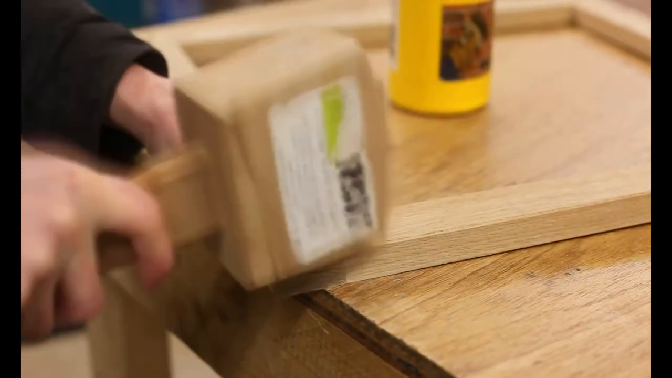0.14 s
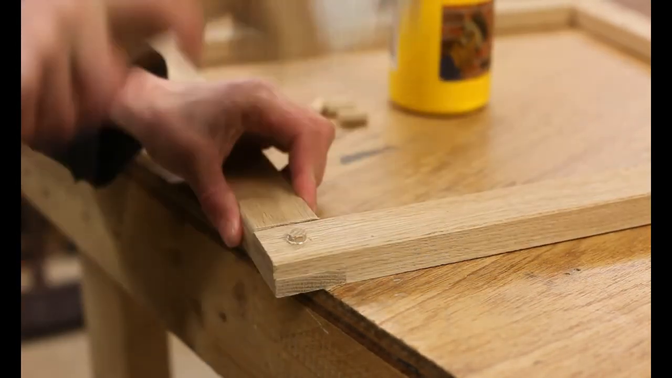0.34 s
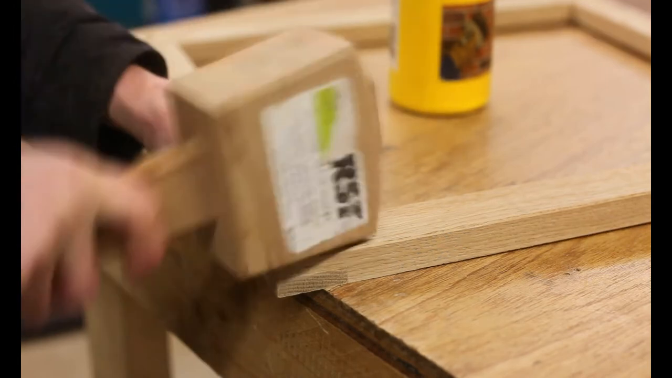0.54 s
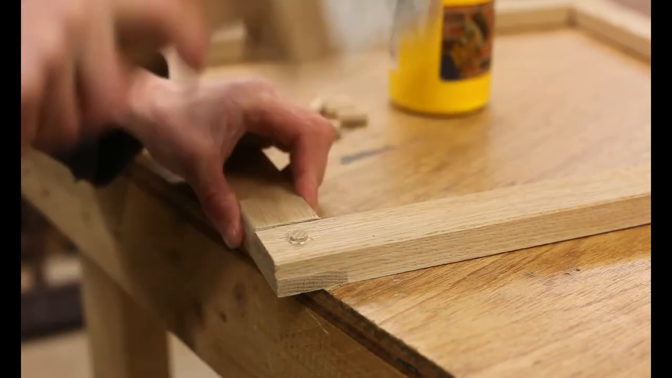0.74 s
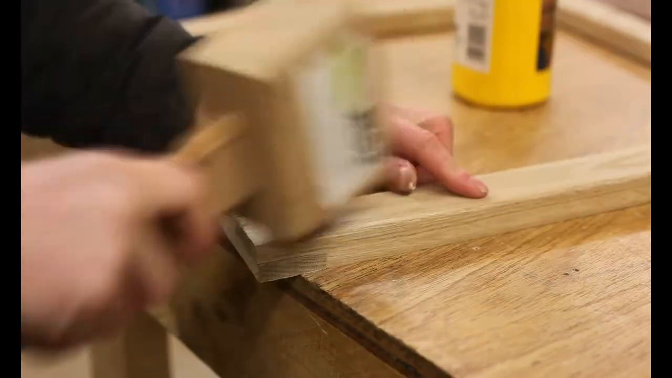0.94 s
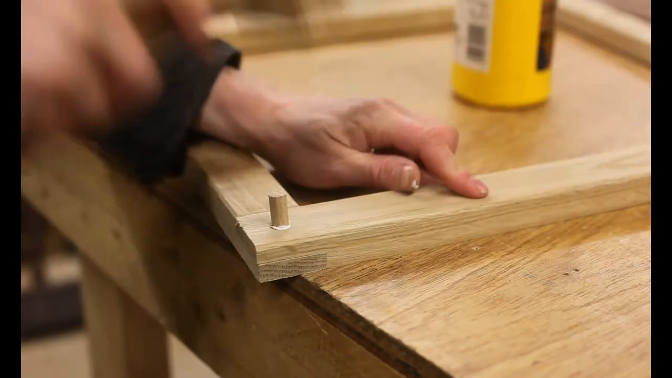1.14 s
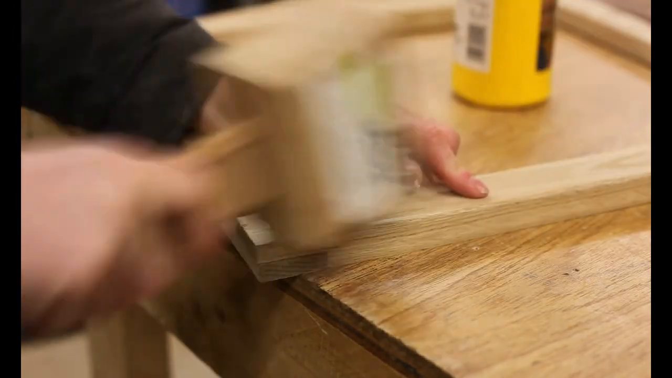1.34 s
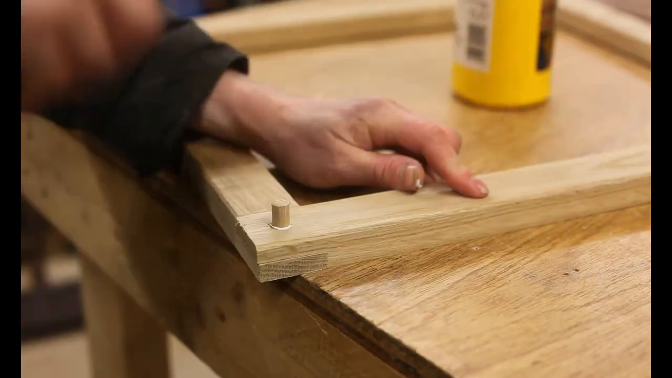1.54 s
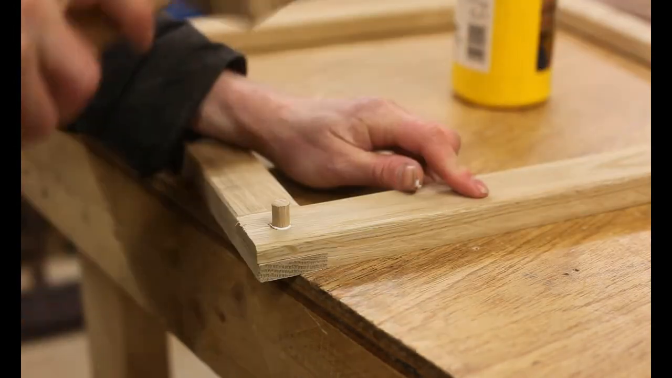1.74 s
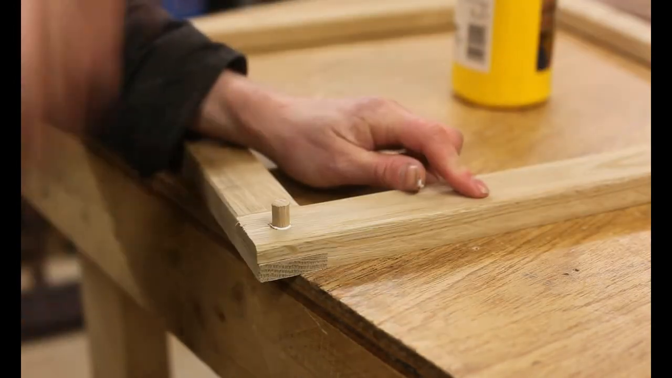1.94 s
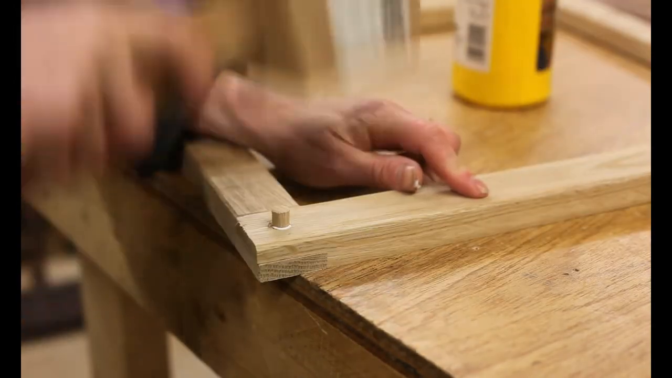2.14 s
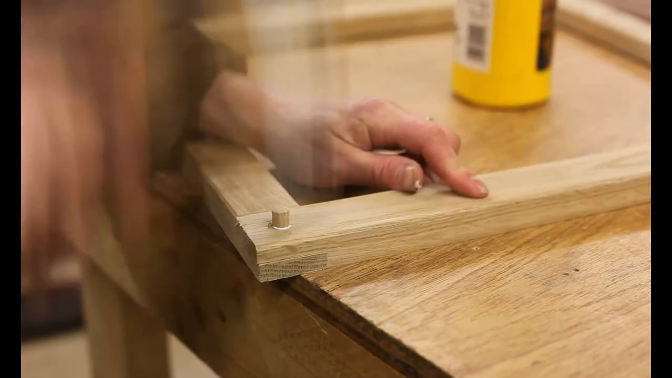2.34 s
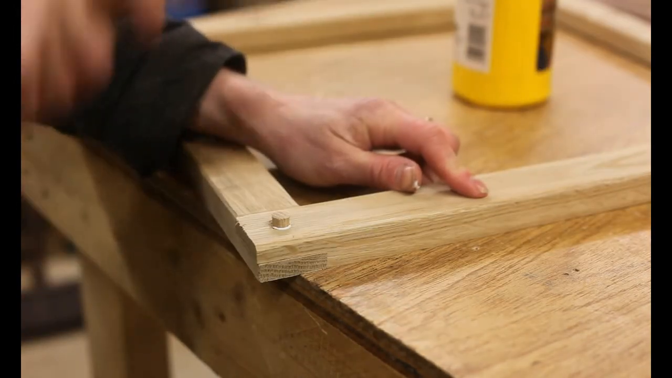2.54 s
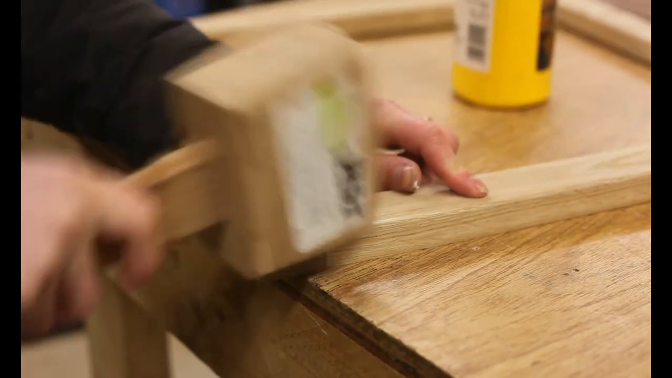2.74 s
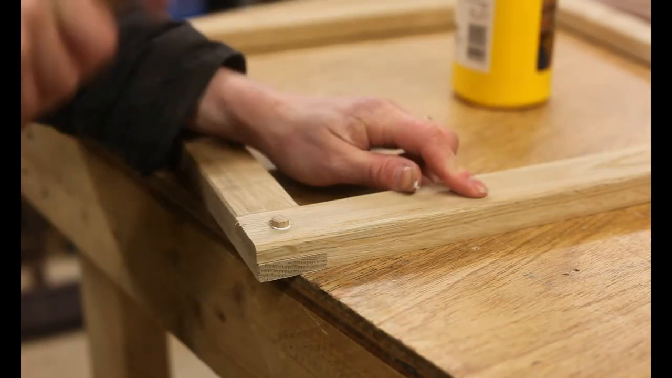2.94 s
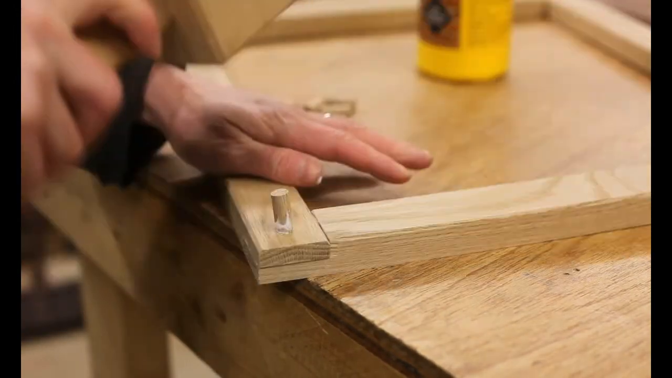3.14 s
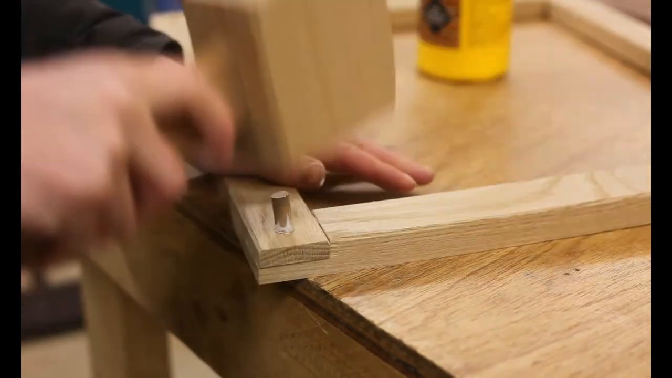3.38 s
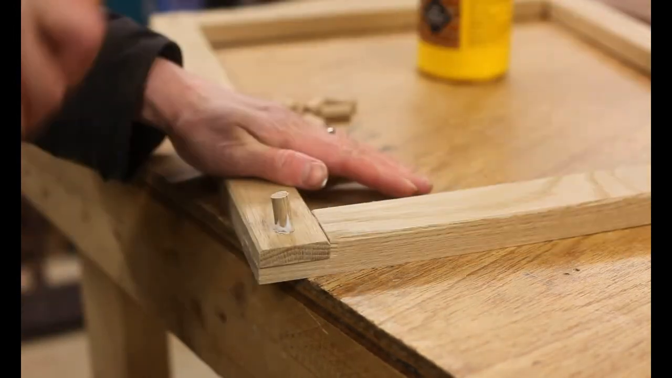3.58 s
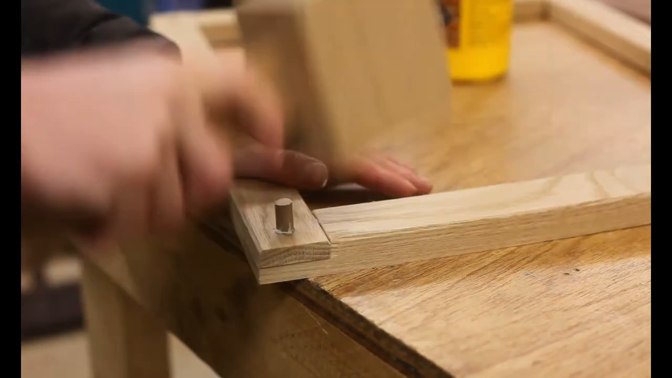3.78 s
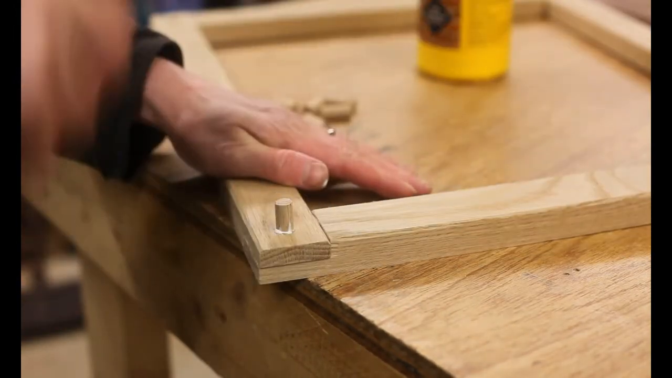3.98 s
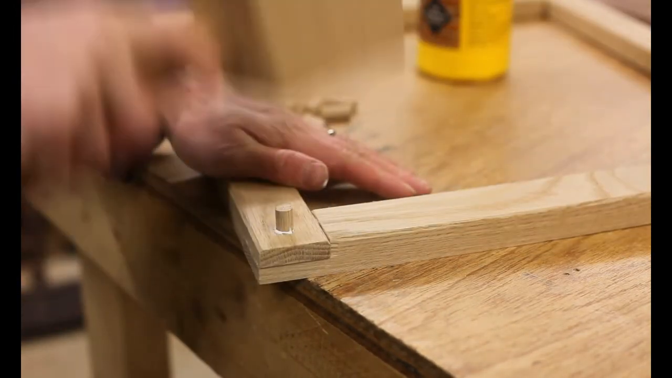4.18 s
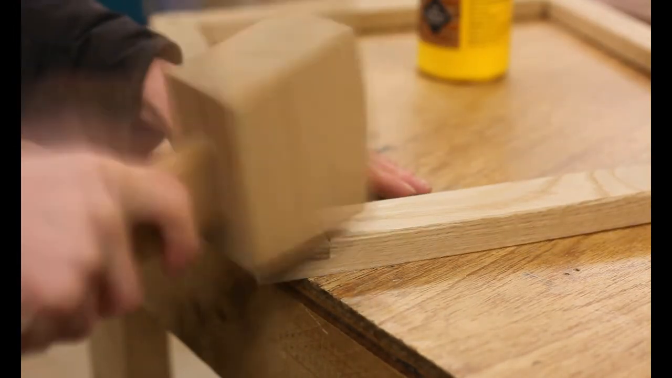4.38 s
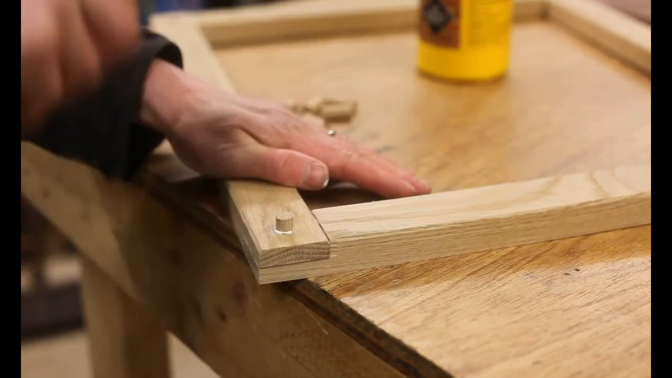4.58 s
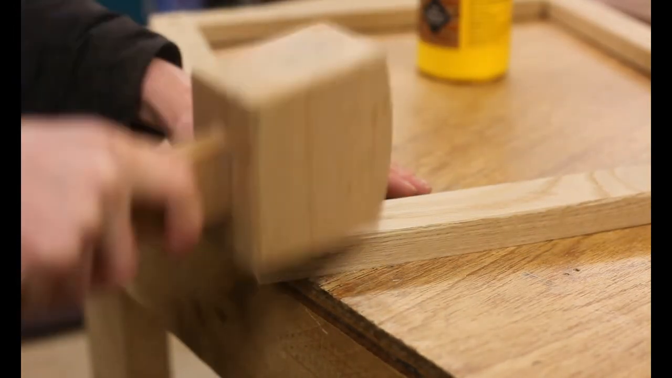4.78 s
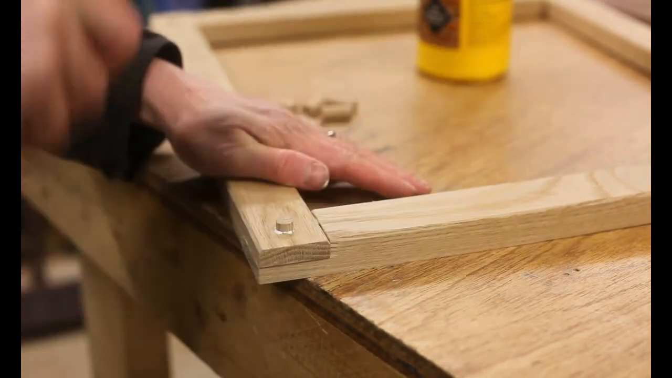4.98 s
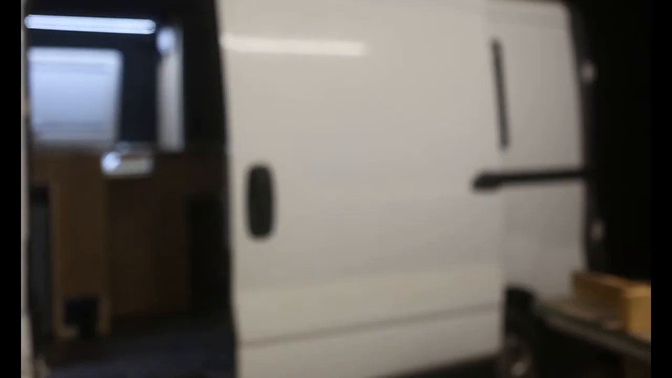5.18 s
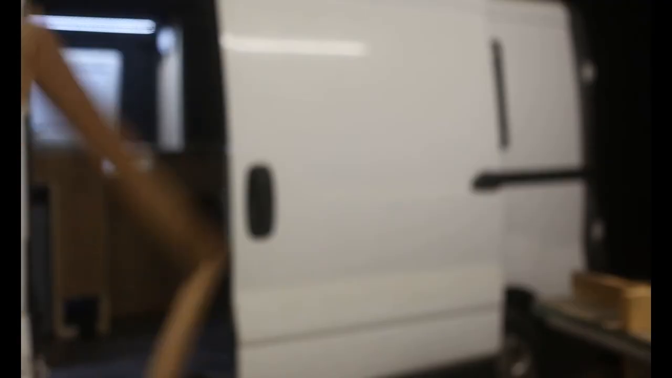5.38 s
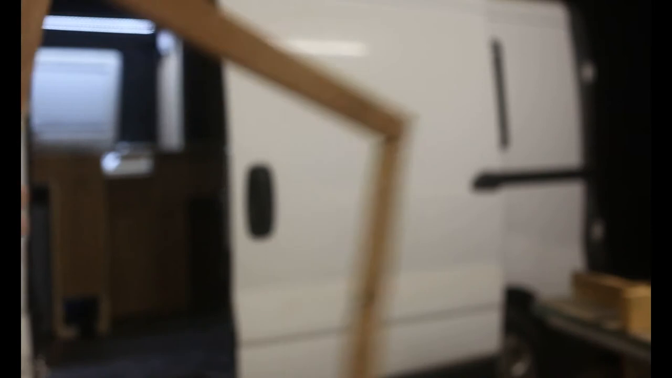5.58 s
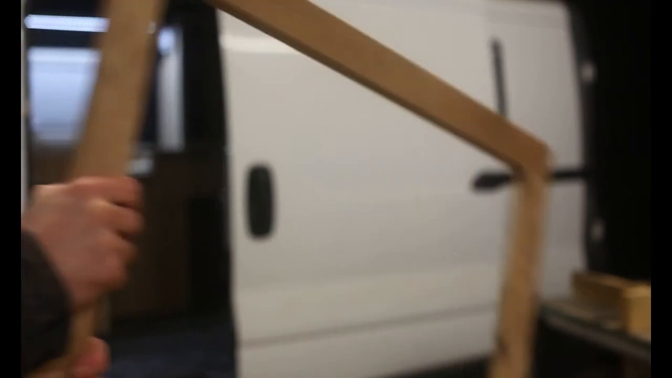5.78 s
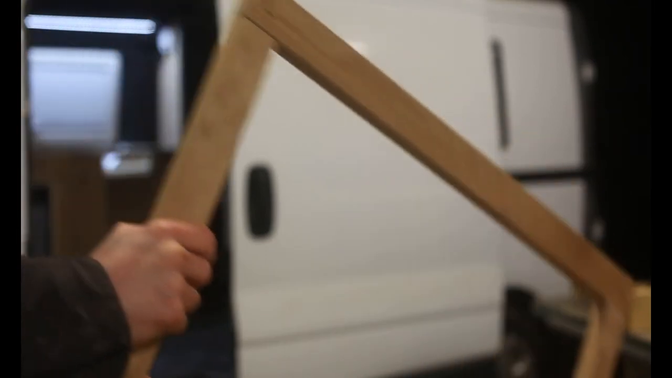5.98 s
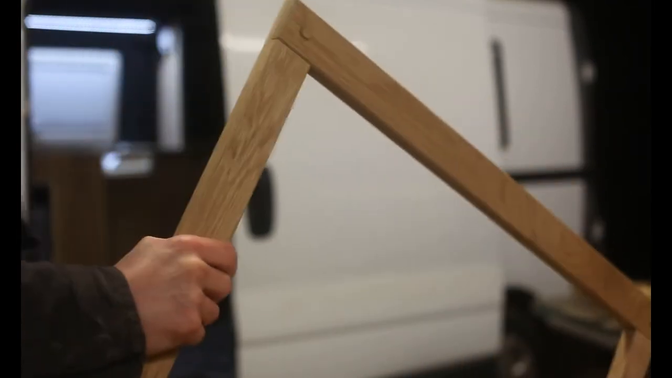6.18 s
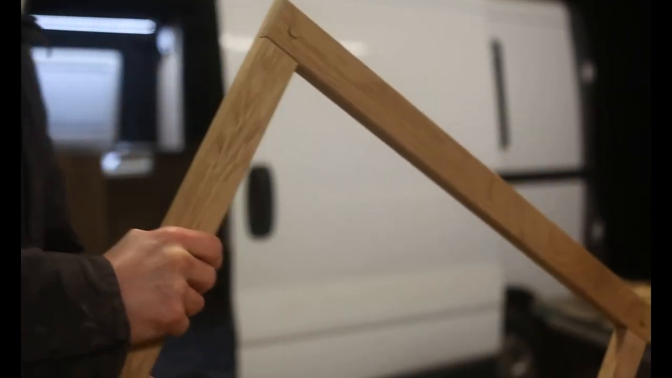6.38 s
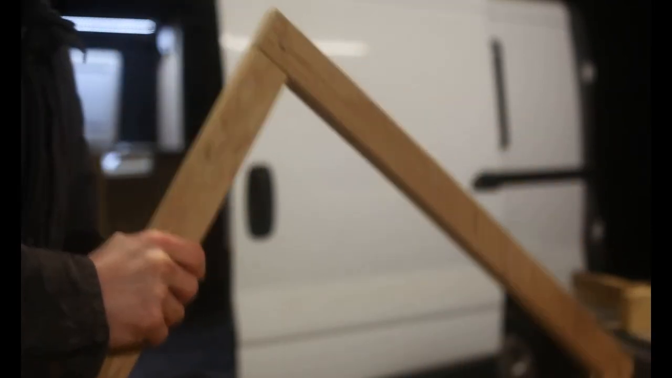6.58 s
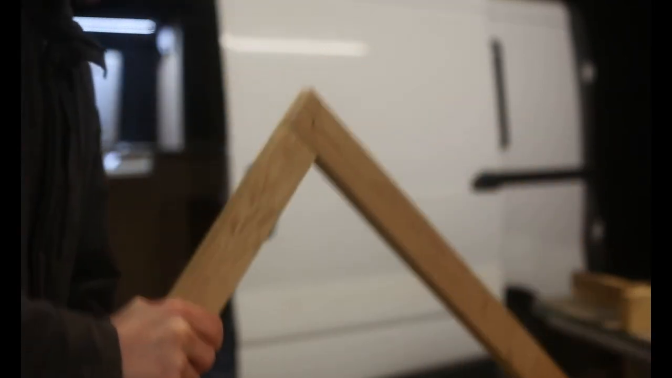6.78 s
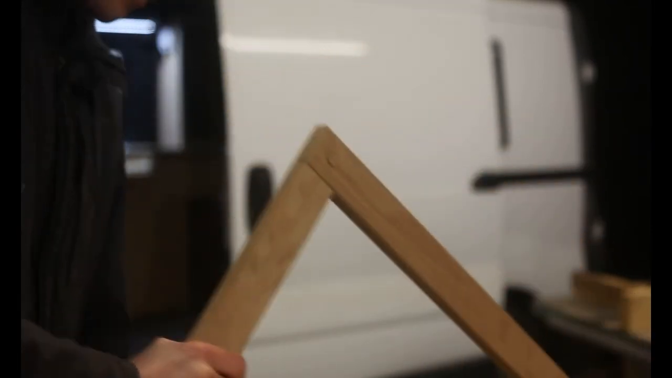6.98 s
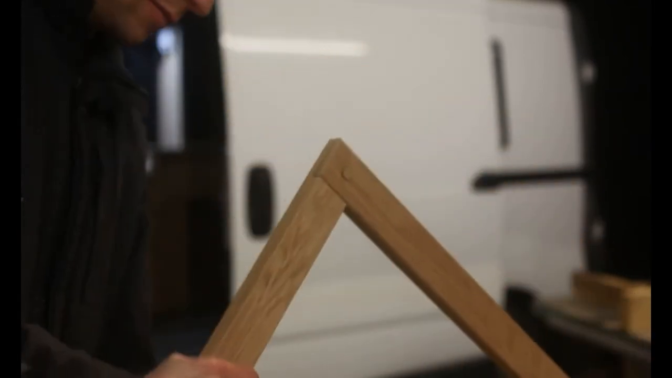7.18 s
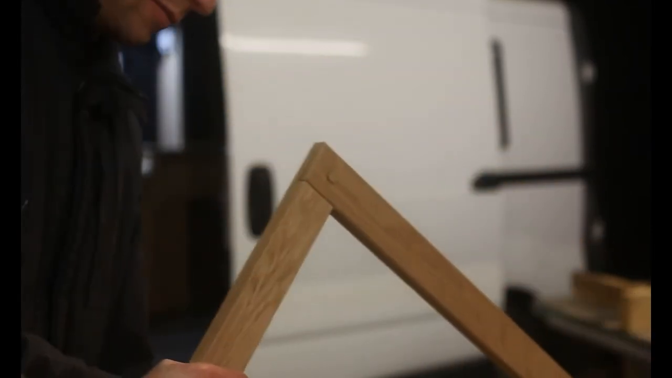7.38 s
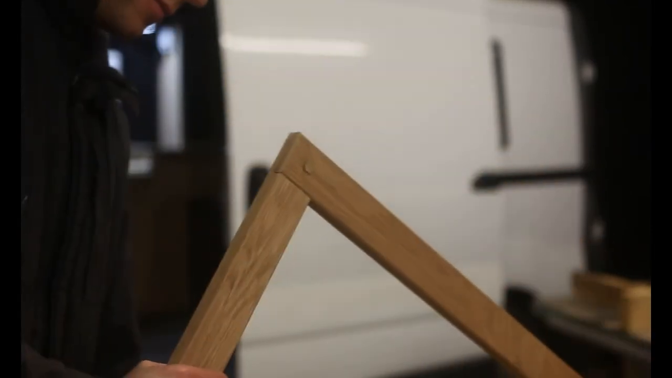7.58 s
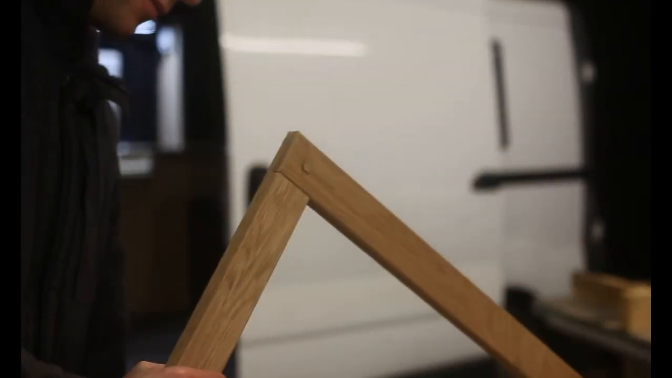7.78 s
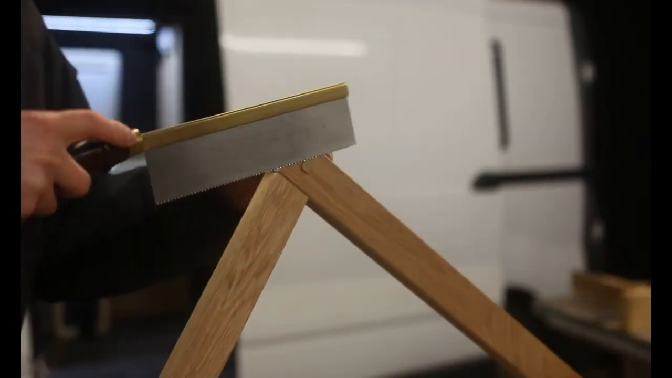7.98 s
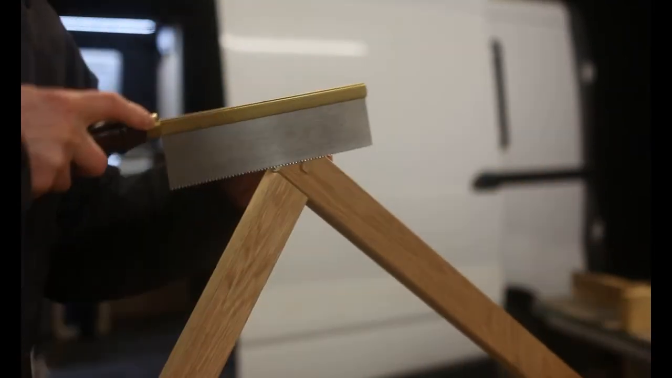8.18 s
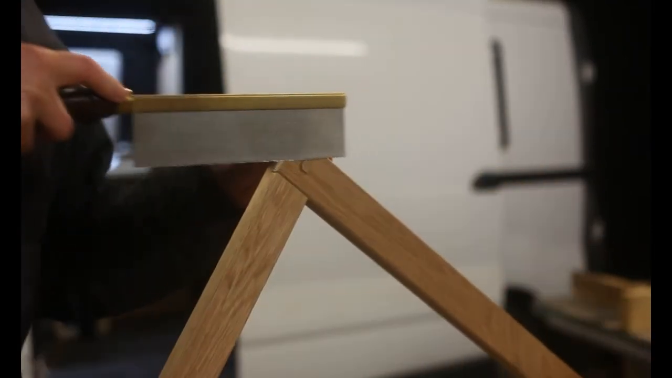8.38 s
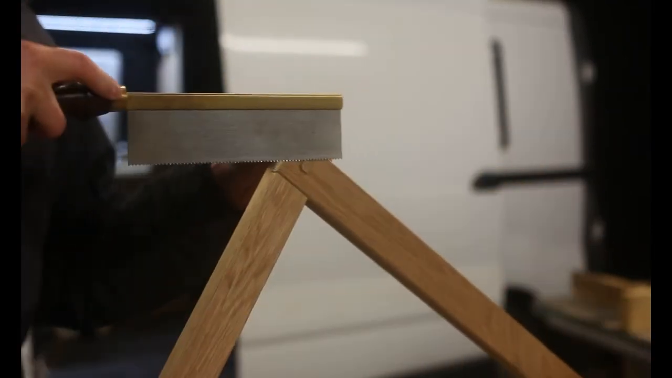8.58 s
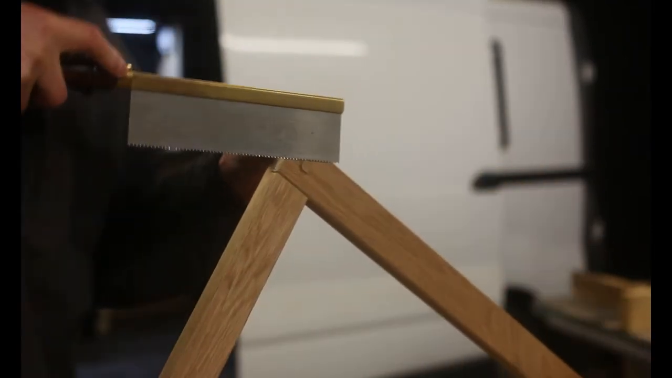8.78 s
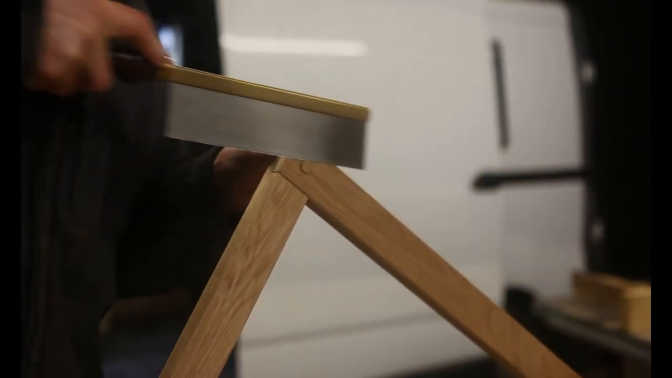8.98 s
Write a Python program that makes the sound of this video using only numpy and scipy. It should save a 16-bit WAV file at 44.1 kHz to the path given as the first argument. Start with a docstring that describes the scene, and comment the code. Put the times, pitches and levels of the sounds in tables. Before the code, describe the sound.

Close, loud wood-on-wood blows come about three per second, with short ringing, bench thuds and half-second room reverberation over almost silent air. Abrupt cuts clip the tails. Then a louder low rumble and soft hiss arrive, with an irregular cluster of frame knocks and sleeve scuffs, a quieter gap, and finally a fine-toothed saw starting to bite into a wooden peg.

```python
"""Four stretches of work on an oak frame, spliced together, in a live workshop.
Over a quiet hush, a wooden mallet drives pegs into the joints on a bench: cracks, ringing wood and thuds.
After the last splice, amid rumble and hiss by the open door, the frame is stood up and knocked into place
with clacks and booms while hands and sleeves rub the wood; then a small back saw starts to trim a peg,
tooth by tooth. The blows are hard enough to overload the microphone, and gain control ducks them."""
import sys
import numpy as np
from scipy import signal
from scipy.fft import rfft, irfft, next_fast_len
from scipy.io import wavfile

SR = 44100
rng = np.random.default_rng(int(sys.argv[2]) if len(sys.argv) > 2 else 0)


def master(y):
    """Save y as 16-bit WAV."""
    cut = np.clip(np.atleast_2d(y).T, -1, 1)
    pcm = np.round(cut * 32767)  # scale
    wavfile.write(sys.argv[1], SR, pcm.astype(np.int16))


N = 398663
TIME = np.arange(N) / SR
RING_TIME = TIME[:SR // 4]


def from_db(db):
    """Turn decibels into a gain."""
    return 10 ** (np.asarray(db) / 20)


def rms_one(x):
    """Scale a lasting sound to unit rms."""
    return x / np.sqrt(np.mean(x ** 2) + 1e-20)


def unit_energy(x):
    """Scale a short sound to unit energy."""
    return x / np.sqrt(np.sum(x ** 2) + 1e-20)


def at_hz(points, hz):
    """Read a table between its points, on a log-frequency axis."""
    table_hz, value = np.transpose(points)
    return np.interp(np.log(np.maximum(hz, 1)), np.log(table_hz), value)


def colour(x, spectrum):
    """Give a noisy signal a spectrum, at unit rms."""
    size = next_fast_len(len(x))
    gain = from_db(at_hz(spectrum, np.fft.rfftfreq(size, 1 / SR)))
    return rms_one(irfft(rfft(x, size) * gain, size)[:len(x)])


def butter(x, hz, kind, order=2):
    """Filter forward in time with a Butterworth filter."""
    edge_hz = np.clip(hz, 10, .45 * SR)
    return signal.sosfilt(signal.butter(order, edge_hz, kind, fs=SR, output="sos"), x)


def resonate(x, hz, width):
    """Pass a signal through one resonance with gain 1 at its peak; a narrower one rings longer."""
    r = np.exp(-np.pi * width / SR)
    feedback = [1, -2 * r * np.cos(2 * np.pi * hz / SR), r * r]
    return signal.lfilter(np.array([1, 0, -1]) * (1 - r * r) / 2, feedback, x)


def ring(modes, spread_db):
    """Struck wood rings as damped sines, each struck with a random strength of its own; unit energy."""
    total = np.zeros(len(RING_TIME))
    for k, (hz, db, t60) in enumerate(modes):
        sine = np.sin(2 * np.pi * hz * RING_TIME) * from_db(-60 * RING_TIME / t60)
        strength = from_db(db + spread_db * rng.normal())
        total += strength * (-1) ** k * unit_energy(sine)   # neighbours swing in opposite directions
    return unit_energy(total)


def crack(spectrum):
    """Wood hitting wood: a sharp pulse with its energy as early as its smooth spectrum allows."""
    log_gain = np.log(from_db(at_hz(spectrum, np.fft.rfftfreq(SR, 1 / SR))))
    cepstrum = irfft(log_gain, SR)
    # doubling the first half of the cepstrum makes the pulse minimum phase
    pulse = irfft(np.exp(rfft(2 * cepstrum[:SR // 2], SR)), SR)
    return unit_energy(pulse[:len(RING_TIME)])


# Workshop reverberation. Each row: frequency in Hz, time to fall by 60 dB in seconds.
ROOM_DECAY = [(60, 0.32), (140, 0.48), (400, 0.45), (800, 0.55), (1500, 0.55), (4000, 0.55), (7000, 0.47),
              (10000, 0.39), (15000, 0.39)]


def room(direct_db, near_db, near_t60, build_s):
    """Direct sound, a quick scatter from the wood nearby, then the walls, dying away band by band."""
    t, hz = TIME[:SR], np.fft.rfftfreq(SR, 1 / SR)
    white = rfft(rng.standard_normal(SR))
    edges = np.r_[0, np.geomspace(100, 20000, 13)]
    tail = np.zeros(SR)
    for low, high in zip(edges, edges[1:]):
        band = irfft(white * (hz >= low) * (hz < high), SR)
        tail += band * np.exp(-np.log(1000) * t / at_hz(ROOM_DECAY, (low + high) / 2))
    near = rng.standard_normal(SR) * np.exp(-np.log(1000) * t / near_t60)
    build_up = 1 - np.exp(-t / build_s)
    return (tail + from_db(near_db) * near) * build_up + from_db(direct_db) * (t == 0)


# Splices between the four stretches. Each row: time in seconds, step in the lingering ring in dB.
SPLICE_POINTS = [(0.857, -12), (3.136, -41), (5.176, -22.5)]


def add(track, s, sound):
    """Lay a sound into the track; whatever still rings steps down at each splice it crosses."""
    t = s + np.arange(len(sound)) / SR
    step = sum(step_db * (t > cut) * (cut > s) for cut, step_db in SPLICE_POINTS)
    sound = sound * from_db(step)
    start = max(round(s * SR), 0)
    part = sound[start - round(s * SR):][:N - start]   # a sound begun before time zero loses its head
    track[start:start + len(part)] += part


# Background at the bench. Each row: frequency in Hz, relative density in dB per Hz.
BENCH_SPECTRUM = [(30, -12.5), (110, -8), (250, -4.5), (600, -14), (2000, -15.5), (6500, -15),
                  (10000, -34.5), (16000, -38.5)]
# Background by the open door. Each row: frequency in Hz, relative density in dB per Hz.
DOOR_SPECTRUM = [(15, -22), (25, -5.5), (108, -4), (217, -12.5), (285, -9), (439, -14.5), (531, -17.5),
                 (911, -18.5), (1440, -23), (1740, -22), (3820, -23), (5880, -17.5), (16000, -46.5)]
BENCH_AIR_DB, DOOR_AIR_DB = -70, -42   # rms level


def air():
    """Steady coloured noise: a hush at the bench, then rumble and hiss by the door."""
    bench = from_db(BENCH_AIR_DB) * colour(rng.standard_normal(N), BENCH_SPECTRUM)
    door = from_db(DOOR_AIR_DB) * colour(rng.standard_normal(N), DOOR_SPECTRUM)
    return np.where(TIME < SPLICE_POINTS[-1][0], bench, door)


# Hands and sleeves slide over wood.
# Each row: middle in seconds, half the full length in seconds, relative level in dB, centre of the hiss in Hz.
RUB_EVENTS = [(5.472, 0.054, -30.5, 5340), (5.532, 0.078, -33, 5200), (5.907, 0.097, -45, 1570),
              (6.027, 0.013, -33.5, 6350), (6.269, 0.11, -30, 5500), (6.58, 0.063, -26.5, 5700),
              (6.696, .12, -39, 4940), (6.808, 0.066, -32.5, 4830), (7.548, 0.15, -45, 8200),
              (7.847, 0.17, -46, 4700)]


def rubs(grain_db, dull_db):
    """Short swells of grainy friction: a hiss over a duller scuff."""
    out = np.zeros(N)
    for s, half_length, level_db, centre_hz in RUB_EVENTS:
        size = int(2 * half_length * SR)
        grains = rng.standard_normal(SR) * from_db(grain_db * rng.standard_normal(SR))
        hiss = rms_one(butter(grains, [centre_hz / 1.36, centre_hz * 1.33], "band"))
        scuff = rms_one(butter(grains, [centre_hz / 8, centre_hz / 2], "band"))
        friction = (hiss + from_db(dull_db) * scuff)[:size]
        add(out, s - half_length, from_db(level_db) * friction * np.hanning(size) ** 2)
    return out


# Saw strokes. Each row: start in seconds, attack in seconds, hold in seconds, bite in dB,
# shaking of the frame in dB (both relative).
SAW_STROKES = [(8.016, 0.24, 0.03, -23.5, -29.5), (8.258, 0.013, 0.023, -12.5, -36),
               (8.44, 0.042, 0.013, -33.5, -40), (8.594, 0.003, 0.016, -30.5, -46),
               (8.762, 0.027, 0.028, -23, -58), (8.854, 0.014, 0.064, -11.5, -21.5)]
# a stroke swells until the teeth bite, sags a little as the arm runs on, then dies away
SWELL_DB, SAG_DB_PER_S, RELEASE_DB_PER_S = 22.5, 31.5, 231
# the frame is slow to start shaking and slow to settle
SHAKE_BUILD_S, SHAKE_LAG_S, SHAKE_RELEASE_DB_PER_S = 0.049, 0.073, 73.5


def stroke_levels():
    """Gain of the bite and of the frame's shaking: each stroke is an attack, a hold and a release."""
    bite, shake = np.zeros(N), np.zeros(N)
    for s, attack, hold, bite_db, shake_db in SAW_STROKES:
        t = np.maximum(TIME - s, 0)
        swell = SWELL_DB * np.minimum(t / attack - 1, 0)
        sag = SAG_DB_PER_S * np.clip(t - attack, 0, hold)
        release = RELEASE_DB_PER_S * np.maximum(t - attack - hold, 0)
        settle = SHAKE_RELEASE_DB_PER_S * np.maximum(t - attack - hold - SHAKE_LAG_S, 0)
        build = (1 - np.exp(-t / SHAKE_BUILD_S)) ** 2
        # overlapping strokes add as energy
        bite = np.hypot(bite, from_db(bite_db + swell - sag - release) * (t > 0))
        shake = np.hypot(shake, from_db(shake_db - settle) * build)
    return bite, shake


# Tearing fibres. Each row: frequency in Hz, relative density in dB per Hz.
RASP_SPECTRUM = [(180, -40), (300, -2.5), (354, -40), (398, -10), (565, -11), (900, 1), (1300, -1),
                 (1410, 0), (2520, -0.5), (4440, 0), (5900, 1), (8790, -5.5), (16000, -47)]
# Resonances of the saw blade. Each row: frequency in Hz, width in Hz, relative gain in dB.
BLADE_MODES = [(898, 30, -9), (2500, 59, -13), (2900, 67, -5), (3800, 130, -5), (4760, 81, 7),
               (5700, 880, 1), (7320, 99, 1)]
# The frame as the saw shakes it. Each row: frequency in Hz, width in Hz, relative gain in dB.
SWAY_MODES = [(131.6, 8.3, 3), (210, 26, -8.5), (407, 16, -15.5)]
# a faster blade bites harder: tooth rate at 0 dB of bite, and the rise in bite that doubles it
TEETH_PER_S, DB_PER_DOUBLING = 1100, 13


def saw(tooth_decay, tooth_db, blade_db, shudder_db):
    """Every tooth snags and tears a tuft of fibres; the jolts ring the blade and shake the frame."""
    bite, shake = stroke_levels()
    bite_db = 20 * np.log10(bite + 1e-9)
    teeth_per_s = TEETH_PER_S * 2 ** (bite_db / DB_PER_DOUBLING)
    unsteady = rms_one(butter(rng.standard_normal(N), 90, "low"))
    travel = np.cumsum(teeth_per_s * np.exp(.2 * unsteady)) / SR   # counted in teeth
    snag = from_db(tooth_db * rng.standard_normal(N))[travel.astype(int)]   # one strength per tooth
    grip = snag * np.exp(-tooth_decay * (travel % 1))
    # where there is no bite, an average grip stands in
    steady_grip = np.where(bite > 0, grip, grip[bite > 0].mean())
    tearing = rms_one(steady_grip * rng.standard_normal(N))
    blade = rms_one(sum(from_db(db) * resonate(tearing, hz, width) for hz, width, db in BLADE_MODES))
    sing = from_db(blade_db + .5 * (bite_db - bite_db.max()))   # the blade sings as the teeth bite deeper
    rasp = bite * (colour(tearing, RASP_SPECTRUM) + sing * blade)
    sway = rms_one(sum(from_db(db) * resonate(tearing, hz, width) for hz, width, db in SWAY_MODES))
    return rasp + from_db(shudder_db) * shake * sway


# The frame is stood up. Each row: time in seconds, force in dB, thud against the clack in dB,
# contact cut-off in Hz, ring of the struck rail in Hz.
FRAME_BUMPS = [(5.543, -36, -4, 1190, 830), (6.030, -17, 9, 4530, 1100), (6.053, -7.5, -2, 3500, 2120),
               (6.064, -25, 9, 4500, 2630), (6.203, -21.5, 11.5, 3000, 655), (6.226, -23.5, 8, 895, 400),
               (6.4692, -24, 2, 1990, 1570), (6.652, -25.5, -4, 5070, 1330), (6.677, -25.5, -1, 4000, 2230),
               (6.884, -43, 15, 298, 198), (6.985, -19, 0.5, 2490, 1390), (7.199, -27, -24, 4000, 2500),
               (7.212, -16.5, 0.5, 2900, 3300), (7.832, -44, -18, 2480, 1000)]
# The upright frame. Each row: frequency in Hz, relative strength in dB, time to fall by 60 dB in seconds.
UPRIGHT_MODES = [(59.3, -8.5, 0.51), (107, -7, 0.23), (129, 1.5, 0.087), (181.5, -2, 0.26), (285, 1, 0.11),
                 (345, -2.5, 0.046), (550, -3.5, 0.019), (670, -6.5, 0.053)]
# Its clack. Each row: frequency in Hz, relative density in dB per Hz.
CLACK_SPECTRUM = [(40, -23), (150, 5.5), (450, 1), (900, 1), (1700, 0), (2800, -1.5), (4500, -0.5),
                  (8000, -1.5), (16000, -42)]


def frame_knocks(body_db, rail_db, rail_q, level_db):
    """The frame bumps against its support: the struck rail clacks and the whole booms in its bending modes."""
    out, pulse = np.zeros(N), crack(CLACK_SPECTRUM)
    for s, force_db, thud_db, contact_hz, rail_hz in FRAME_BUMPS:
        contact = unit_energy(butter(pulse, contact_hz, "low"))
        rail = unit_energy(resonate(contact, rail_hz, rail_hz / rail_q))
        clack = unit_energy(contact + from_db(rail_db) * rail)
        boom = from_db(body_db + thud_db) * ring(UPRIGHT_MODES, spread_db=5.5)
        walls = room(direct_db=23, near_db=6.5, near_t60=0.11, build_s=0.00059)
        add(out, s, from_db(level_db + force_db) * signal.fftconvolve(clack + boom, walls))
    return out


# Mallet blows; the first falls before the start, so only its end is heard.
# Each row: time in seconds, force in dB, bench thud in dB (both relative), contact cut-off in Hz.
MALLET_BLOWS = [(-.22, -6, -5, 7100), (0.1429, -1, 4, 8000), (0.5244, 0.5, 3, 6900),
                (0.936, -14.5, -1, 6340), (1.325, -11.5, -2, 7000), (2.005, -4, 0, 8700),
                (2.374, -5.5, 0.5, 8300), (2.726, 0.5, 1, 6300), (3.070, 3, 2, 6860),
                (3.2085, -12, 0.5, 6860), (3.654, -9.5, -1.5, 9100), (4.031, -5, -2, 8600),
                (4.367, -5.5, 0, 9800), (4.702, 0.5, -1, 7400), (5.044, 0.5, -4, 7400)]
# Peg, frame and mallet head.
# Each row: frequency in Hz, relative strength in dB, time to fall by 60 dB in seconds.
JOINT_MODES = [(1495, -11.5, 0.034), (1560, -3.5, 0.089), (1673, -1.5, .05), (1725, 3.5, 0.036),
               (2250, -3, 0.039), (2296, 3.5, 0.034), (3175, -10, 0.066), (3500, -25, 0.051),
               (3900, -4.5, 0.0028), (4180, -11.5, 0.026), (5800, -7.5, 0.017)]
# Bench top. Each row: frequency in Hz, relative strength in dB, time to fall by 60 dB in seconds.
BENCH_TOP_MODES = [(131, -3.5, 0.16), (180, -8, 0.17), (250, -1, 0.095), (304.7, -2.5, 0.081),
                   (509, -0.5, 0.011)]
# Crack of wood on wood. Each row: frequency in Hz, relative density in dB per Hz.
CRACK_SPECTRUM = [(40, -18), (150, -11.5), (400, -2), (900, -5.5), (1500, 4.5), (2800, -1.5), (4500, 0),
                  (6800, -1), (8500, -10.5), (11000, -20), (16000, -32.5)]
# Air pushed by the mallet hits the microphone.
# Each row: start in seconds, length in seconds, peak pressure in dB.
AIR_PUFFS = [(4.706, 0.0086, 12), (5.041, 0.016, 0)]


def mallet(modes_db, bench_db, crush_db, level_db):
    """Each blow cracks, rings the joint and thuds into the bench; a softer contact is duller."""
    out, pulse = np.zeros(N), crack(CRACK_SPECTRUM)
    # the bench's thud swells in the room
    boom = room(direct_db=31, near_db=-12.5, near_t60=0.15, build_s=0.009)
    for s, force_db, thud_db, contact_hz in MALLET_BLOWS:
        # a harder blow seats the peg and rings the joint more
        joint = from_db(modes_db + 1.2 * force_db) * ring(JOINT_MODES, spread_db=5.0)
        wood = butter(pulse + joint, contact_hz, "low")
        # every blow radiates a little differently, so each gets a fresh room
        walls = room(direct_db=31.5, near_db=8.5, near_t60=0.24, build_s=0.0028)
        # fibres give way under the head
        crush = from_db(crush_db) * rng.standard_normal(SR) * np.exp(-TIME[:SR] / 0.0019)
        knock = from_db(force_db) * signal.fftconvolve(wood, walls + crush)
        bench = ring(BENCH_TOP_MODES, spread_db=1.5)
        thud = from_db(bench_db + thud_db) * signal.fftconvolve(bench, boom)
        add(out, s, from_db(level_db) * (knock + thud))
    for s, length, pressure_db in AIR_PUFFS:
        add(out, s, -from_db(pressure_db) * np.hanning(int(length * SR)))
    return out


def scene():
    """Background, friction and blows all reach one microphone, copied to both channels."""
    friction = rubs(grain_db=7, dull_db=-4.0)
    friction = friction + saw(tooth_decay=0.47, tooth_db=0.5, blade_db=-2.5, shudder_db=1.5)
    walls = unit_energy(room(direct_db=38.5, near_db=11.5, near_t60=0.04, build_s=0.0034))
    friction = signal.fftconvolve(friction, walls)[:N]
    knocks = frame_knocks(body_db=-0.5, rail_db=-8.5, rail_q=3.6, level_db=-4.0)
    blows = mallet(modes_db=-10, bench_db=-17.0, crush_db=16.5, level_db=-2)
    return np.tile(air() + friction + knocks + blows, (2, 1))


def gain_control(x, limit_db, release_db_per_s, attack_s):
    """Peaks over the limit pull the gain down fast; it recovers slowly, and starts afresh after each splice."""
    r, stretches = np.exp(-1 / (attack_s * SR)), []
    for stretch in np.split(x, [round(s * SR) for s, _ in SPLICE_POINTS], axis=-1):
        recovery = release_db_per_s * TIME[:stretch.shape[-1]]
        over = np.maximum(20 * np.log10(np.abs(stretch) + 1e-9) - limit_db, 0)
        # hold each peak, less what has been recovered since
        held = np.maximum.accumulate(over + recovery, axis=-1) - recovery
        reduction_db = signal.lfilter([1 - r], [1, -r], held)
        stretches.append(stretch * from_db(-reduction_db))
    return np.concatenate(stretches, axis=-1)


CUTOFF_HZ = 16200   # top of the band


def record(dry):
    """The input stage clips softly, gain control ducks the blows, and both ends of the band are cut."""
    top = from_db(-1.5)
    clipped = dry / (1 + (dry / top) ** 6) ** (1 / 6)
    ducked = gain_control(clipped, limit_db=-9.5, release_db_per_s=14.5, attack_s=0.003)
    no_rumble = butter(ducked, 85, "high", order=1)
    return signal.sosfilt(signal.ellip(10, .1, 70, CUTOFF_HZ, fs=SR, output="sos"), no_rumble)


dry = scene()
out = record(dry)
master(out)
```